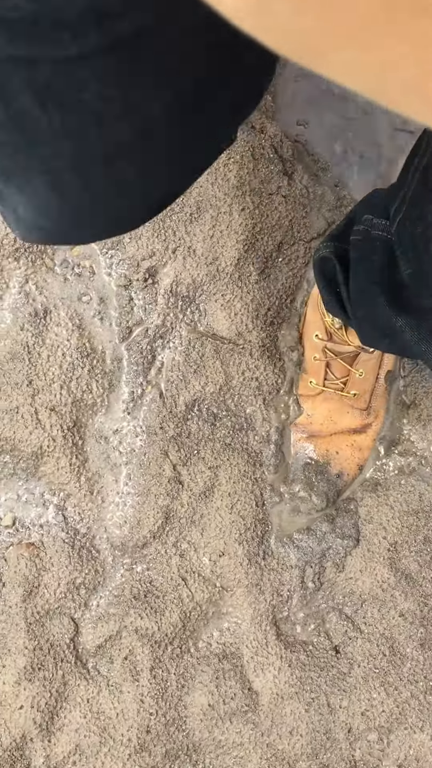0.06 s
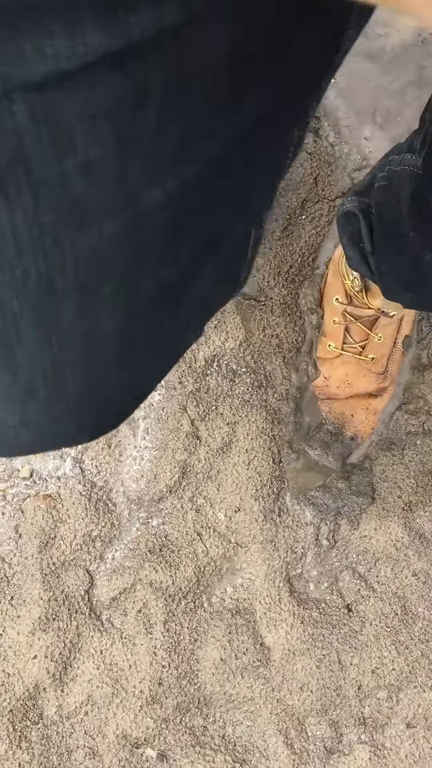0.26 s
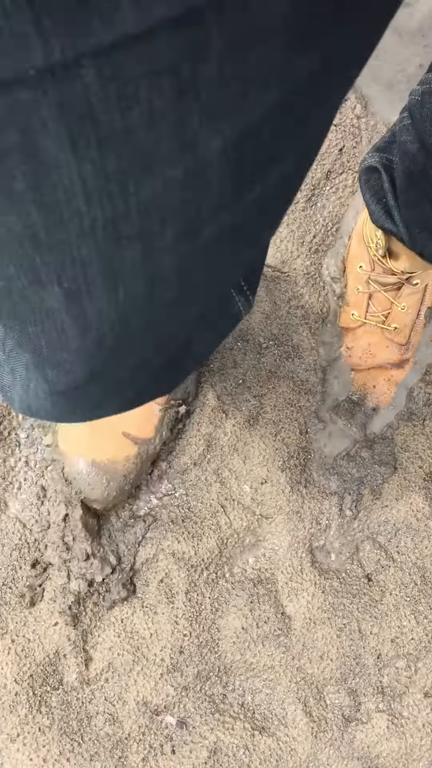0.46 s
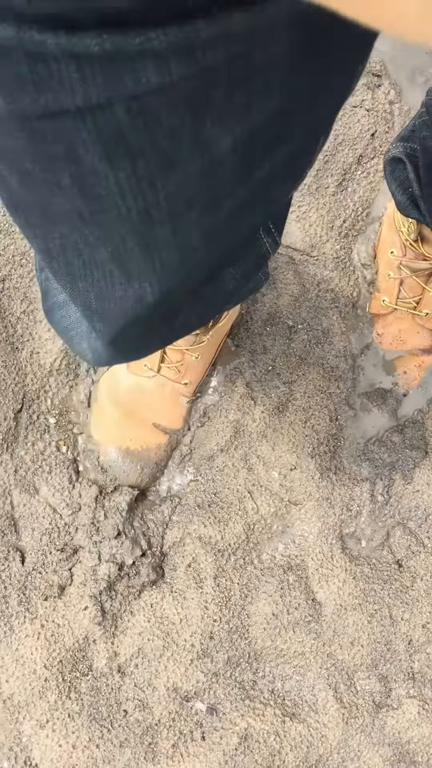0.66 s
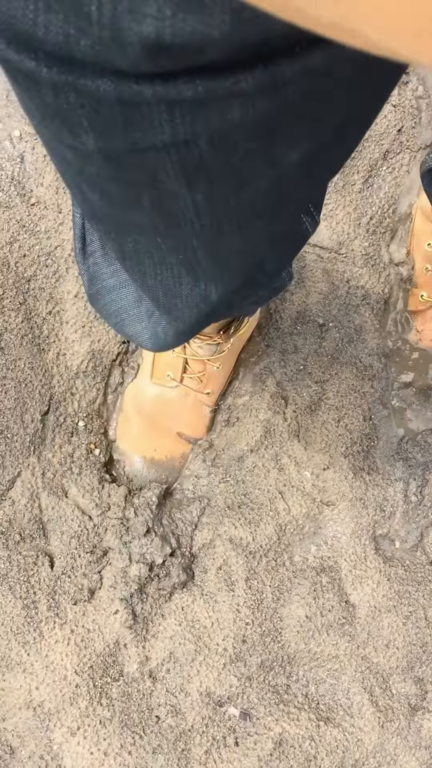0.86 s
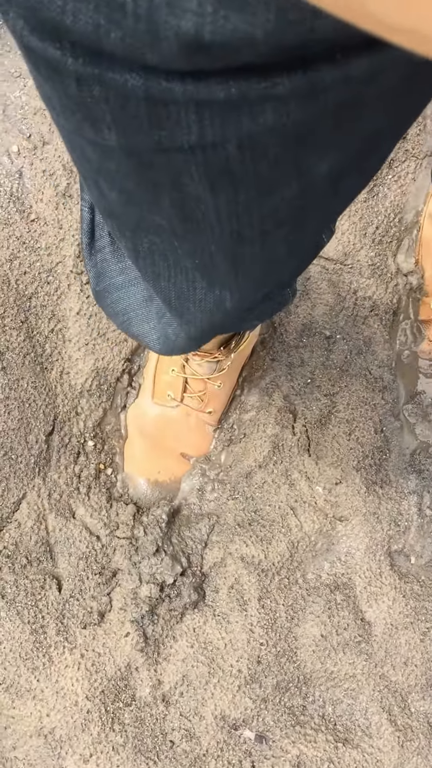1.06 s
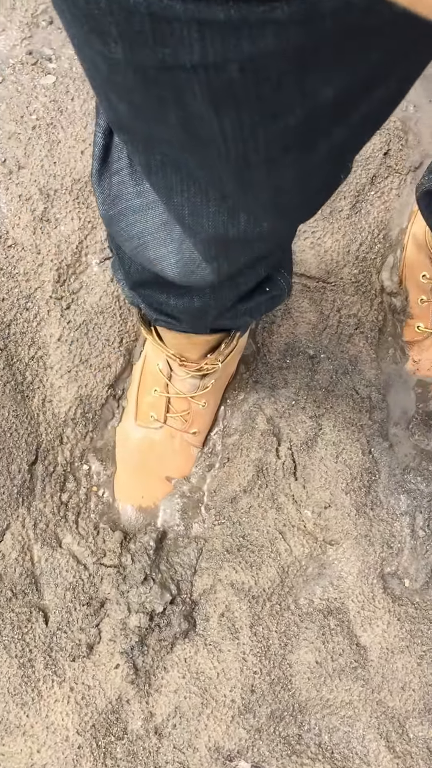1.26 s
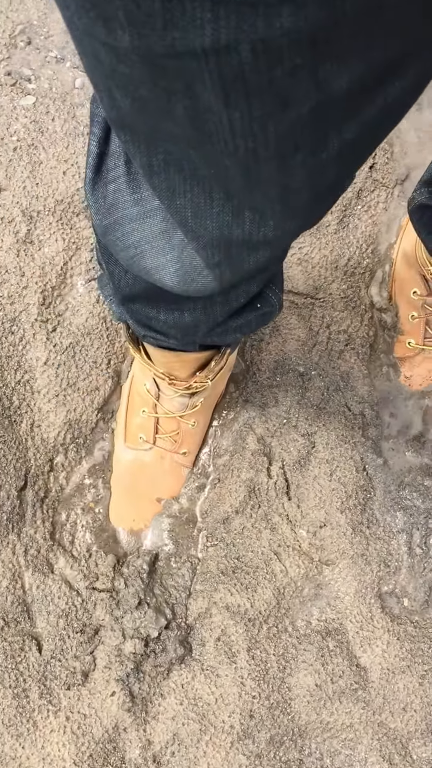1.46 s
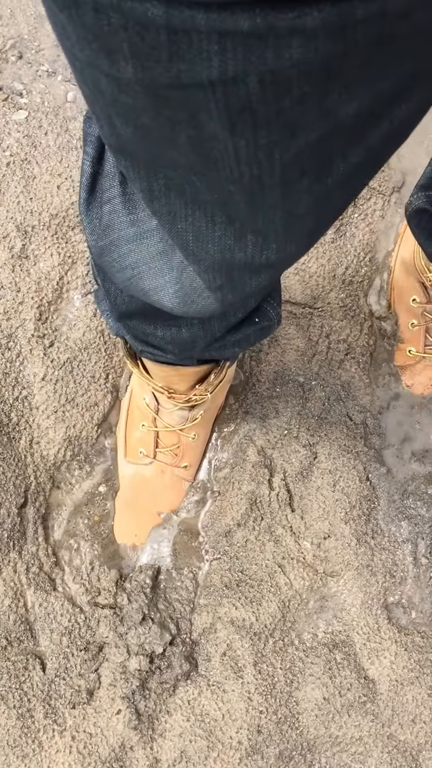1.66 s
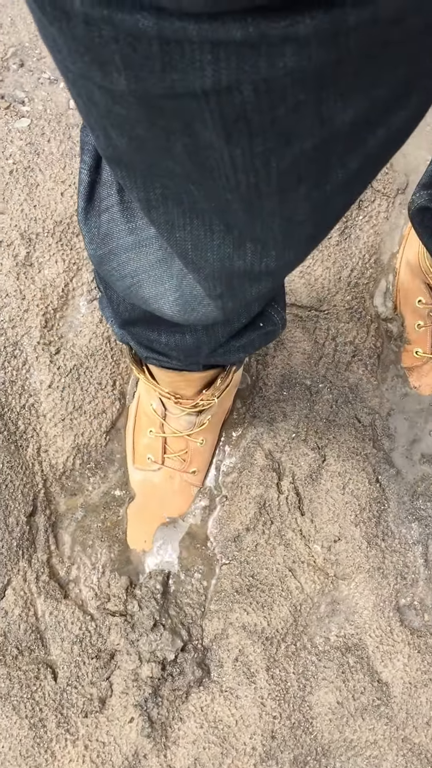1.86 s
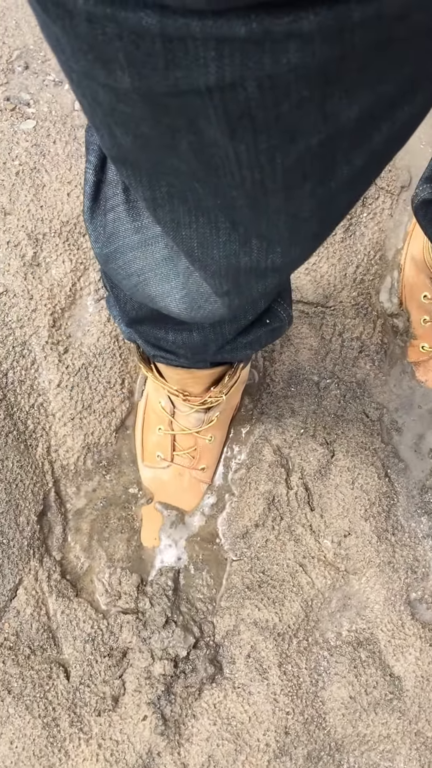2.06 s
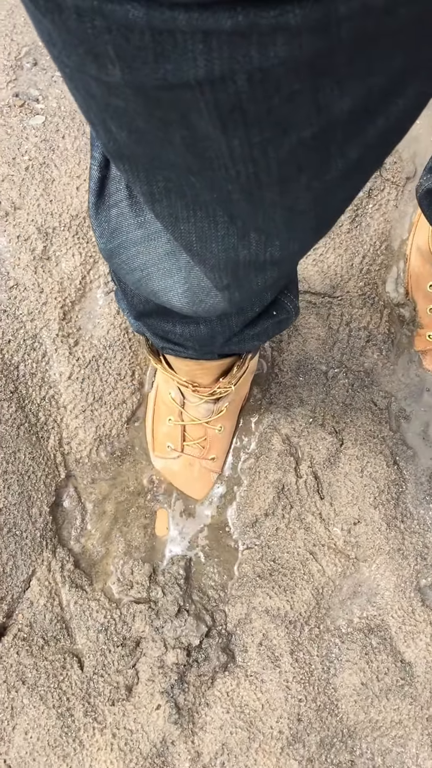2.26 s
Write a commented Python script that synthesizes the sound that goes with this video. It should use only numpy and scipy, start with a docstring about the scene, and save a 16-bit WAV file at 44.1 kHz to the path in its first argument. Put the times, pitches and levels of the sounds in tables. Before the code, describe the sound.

A boot splats once into wet sandy mud outdoors. A soft trouser swish and a light wind bump come first. At 0.5 seconds the boot lands, with squirts, droplet spray and tiny air pops. Water fizzes faintly from the sand until about 1.1 seconds. Wind buffets the microphone in dull, uneven thumps, strongest from 0.6 to 1.7 seconds, then eases to a few weaker bumps around 2 seconds.

```python
"""A trouser leg swishes softly over a faint outdoor background, and wind starts to bump the microphone
in dull, uneven thumps. Half a second in, a boot slaps into wet sandy mud: mud squirts from under the
sole, droplets spray and trapped air pockets pop. Water then fizzes out of the sand as the boot sinks,
while the wind thumps harder."""
import sys
import numpy as np
from scipy import signal
from scipy.fft import rfft, irfft
from scipy.io import wavfile
from scipy.ndimage import map_coordinates

SR = 44100
rng = np.random.default_rng(int(sys.argv[2]) if len(sys.argv) > 2 else 0)


def store_wav(level_fs):
    """Save 16-bit WAV to argv[1]."""
    pcm = np.round(np.clip(np.atleast_2d(level_fs), -1, 1) * 32767)
    wavfile.write(sys.argv[1], SR, pcm.T.astype(np.int16))


N = 105840  # 2.4 seconds

# tone of the outdoor background (frequency [Hz], relative level [dB])
OUTDOOR_TONE = [(20, -12.5), (70, -1.5), (125, -5.5), (170, 8), (215, -14.5), (290, -7.5), (370, -5.5),
                (480, -22), (650, -17.5), (1000, -31.5), (1700, -36), (3500, -47.5), (8500, -52.5),
                (15500, -57.5)]
# tone of the wind's rumble (frequency [Hz], relative level [dB])
RUMBLE_TONE = [(20, -31.5), (40, -9), (75, 5), (120, -4.5), (200, -9), (320, -22), (550, -28.5),
               (900, -51.5), (4000, -92.5)]
# wind strength between the thumps (time [s], level [dB])
WIND_LEVELS = [(0, -47), (.45, -36.5), (.62, -34.5), (.75, -28.5), (1.02, -32), (1.29, -37.5),
               (1.45, -31.5), (1.57, -30.5), (1.7, -29.5), (1.78, -45), (2.15, -37.5), (2.4, -53.5)]
# tone of the swinging trouser leg (frequency [Hz], relative level [dB])
SWISH_TONE = [(250, 11), (370, 19.5), (520, 5.5), (1700, 0), (3500, -13), (7000, -15.5), (15000, -28)]
# two faint ticks of rustling trouser cloth, then small wet ticks around the boot
# (time [s], level [dB], pitch [Hz], width [Hz], fade [s])
SMALL_TICKS = [(.081, -60, 3200, 1630, 0.011), (.097, -64.5, 7750, 1800, .003),
               (.362, -61, 7500, 14000, 0.017), (.4355, -48, 6400, 1500, 0.0017),
               (.6765, -47.5, 6100, 1200, 0.00097), (.724, -61, 8000, 11000, 0.0067),
               (.826, -65, 5500, 6000, 0.009), (.879, -60, 3620, 2540, 0.0061),
               (.938, -70, 6350, 1130, 0.025), (.957, -60.5, 3230, 700, 0.014),
               (1.43, -71, 3570, 1620, 0.026), (1.8942, -49, 7500, 2900, 0.00089)]
# eddies, swirls of air that hit the microphone (time [s], pulse peak [dB], brightness [Hz], churn [s])
WIND_EDDIES = [(0.237, -29.5, 130, 0.029), (0.253, -23.5, 45, 0.0069), (0.577, -17.5, 99.5, 0.012),
               (0.658, -12.5, 168, 0.0037), (0.662, -21.5, 217, 0.0022), (0.7, -21, 274, 0.0022),
               (0.706, -11.5, 115, 0.0027), (0.722, -18.5, 165, 0.018), (.746, -17.5, 370, 0.0052),
               (0.757, -17.5, 225, 0.0053), (0.787, -19.5, 140, 0.023), (.813, -21.5, 267, 0.0037),
               (0.822, -20, 294, 0.0031), (0.846, -18.5, 167, 0.002), (0.864, -20, 102, 0.018),
               (0.877, -15.5, 223, 0.0055), (0.913, -18, 133, 0.0063), (0.924, -16, 50, 0.0086),
               (0.945, -19.5, 167, 0.008), (.984, -24.5, 81, 0.015), (1.014, -22, 132, 0.02),
               (1.076, -18, 131.4, 0.0058), (1.119, -29.5, 195, 0.0061), (1.132, -16.5, 50.6, 0.0067),
               (1.164, -21, 110, 0.0048), (1.187, -21.5, 117, 0.0097), (1.223, -23, 162, 0.019),
               (1.324, -28, 281, 0.0014), (1.345, -19, 50, 0.021), (1.379, -27.5, 120, 0.0033),
               (1.402, -18, 74.5, 0.0029), (1.451, -25.5, 188, 0.0094), (1.5, -22.5, 179, 0.0094),
               (1.534, -25.5, 180, 0.0094), (1.555, -19, 175, 0.013), (1.573, -16, 81, 0.0047),
               (1.64, -24, 215, 0.0081), (1.664, -22.5, 333, 0.0053), (1.679, -22, 190, 0.01),
               (1.693, -24.5, 220, .003), (1.708, -21.5, 80, 0.017), (1.972, -29, 210, 0.0038),
               (1.989, -25, 58.5, 0.0052), (2.063, -28.5, 49.6, 0.0054), (2.139, -24, 200, 0.003)]
# tone of the squirts, spray and bright rustle (frequency [Hz], boost or cut [dB])
WET_TONE = [(300, 5), (800, 2.5), (1100, 2.5), (2400, 0.5), (2850, -5), (3200, 0.5), (4400, -1), (5000, -8),
            (6000, 1), (7700, -8), (8300, -3.5), (15000, -11)]
# mud squirting from under the sole (time [s], level before WET_TONE [dB], pitch [Hz], width [Hz], fade [s])
MUD_SQUIRTS = [(.4745, -48, 7500, 5000, 0.0093), (.4925, -30, 4400, 4000, 0.0053),
               (.4955, -20, 2800, 2930, 0.00098), (.5098, -27.5, 2930, 1800, 0.0041),
               (.5208, -24.5, 3020, 5530, 0.0011), (.5245, -20.5, 4000, 9050, 0.0016),
               (.542, -46, 4500, 3030, 0.0034), (.5515, -38, 2160, 2500, 0.003),
               (.5605, -24, 13200, 5000, 0.00096), (.5742, -33.5, 2250, 2210, 0.0028),
               (.5795, -36.5, 3800, 6530, 0.0065), (.5945, -45, 5100, 3000, 0.0015)]
# tone of the droplet spray, before WET_TONE (frequency [Hz], relative level [dB])
SPRAY_TONE = [(400, -36), (1100, -0.5), (2500, -5), (6000, -5), (8000, -6), (11000, -4), (15500, 0)]
# air pockets popping (time [s], level [dB], starting pitch [Hz], fade [s])
AIR_POCKETS = [(.512, -25.5, 1102, 0.0045), (0.5217, -26.5, 1152, 0.0038), (0.5237, -33, 1653, 0.006),
               (0.55, -23, 1250, 0.00081)]
# water fizzing from tiny gaps in the sand (pitch halfway through [Hz], width [Hz], level [dB])
SAND_PORES = [(1900, 2600, -70.5), (3870, 1800, -73), (6030, 1100, -75.5)]

SLAP_S, TOP_HZ = 0.495, 15900  # when the boot lands; upper edge of the sound


def undb(db):
    """Turn decibels into a number to multiply by."""
    return 10 ** (np.asarray(db) / 20)


def rms(x):
    """The average strength of a signal (root mean square)."""
    return np.sqrt(np.mean(x ** 2) + 1e-18)


def unit(x):
    """Scale a signal to an average strength of 1."""
    return x / rms(x)


def colour(x, tone):
    """Turn frequencies up or down, following a tone table."""
    hz, db = np.array(tone, float).T
    f = np.maximum(np.fft.rfftfreq(len(x), 1 / SR), 1)
    return irfft(rfft(x) * undb(np.interp(np.log(f), np.log(hz), db)), len(x))


def resonate(x, hz, width_hz, order):
    """Make a sound ring around one pitch; a higher order lets less of the rest through."""
    f = np.maximum(np.fft.rfftfreq(len(x), 1 / SR), 1)
    return irfft(rfft(x) / (1 + 1j * (f * f - hz * hz) / (f * width_hz)) ** order, len(x))


def wander(per_s):
    """A value that drifts at random, mostly between -1 and 1."""
    step = int(SR / per_s)
    return np.interp(np.arange(N) / step, np.arange(N // 100), rng.standard_normal(N // 100))


def crackle(size, per_s, scatter_db=0):
    """Tiny clicks at random moments; scatter makes some stand out more."""
    hit = rng.random(size) < per_s / SR
    return hit * rng.standard_normal(size) * undb(scatter_db * np.minimum(rng.exponential(size=size), 4))


def noise(tone):
    """Steady noise with the given tone and a strength of 1."""
    return unit(colour(rng.standard_normal(N), tone))


def add(out, start_s, x):
    """Mix a short sound in at a given time."""
    i = max(int(start_s * SR), 0)
    out[i:i + len(x)] += x[:max(N - i, 0)]


def outdoors(level_db=-45):
    """The faint, low, steady background of the open air."""
    return undb(level_db) * noise(OUTDOOR_TONE)


def wind(t, gust_db=3.5):
    """Wind rumbles on the microphone, fluttering with quick gusts."""
    db = np.interp(t, *np.array(WIND_LEVELS).T) + gust_db * wander(per_s=55)
    return undb(db) * noise(RUMBLE_TONE)


def trousers(t, peak_s=0.15, spread_s=0.63, swish_db=-56, flutter_db=3, rustle_db=-61, rustle_s=0.078):
    """Swinging cloth swishes, with a bright rustle that peaks as the boot lands."""
    swing = np.exp(-((t - peak_s) / spread_s) ** 2 / 2)
    swish = swing * undb(swish_db + flutter_db * wander(per_s=38)) * noise(SWISH_TONE)
    rustle = np.exp(-np.abs(t - SLAP_S) / rustle_s) * noise(WET_TONE)
    return swish + undb(rustle_db) * rustle


def click_bursts(rows, order, rise_s=0.00035, size=4096):
    """Cloth rustles or a wet film tears: each is a short cluster of clicks with its own ring."""
    out, t = np.zeros(N), np.arange(size) / SR
    for start, db, hz, width, fade in rows:
        loudness = np.minimum(t / rise_s, 1) * np.exp(-np.maximum(t - rise_s, 0) / fade)
        clicks = crackle(size, per_s=5900, scatter_db=1) * loudness
        burst = resonate(clicks, hz, width, order)
        add(out, start, undb(db) * unit(burst) * rms(loudness))
    return out


def eddies(low_hz=49, high_hz=1080, churn_db=-8, size=8192):
    """Each swirl is a soft pressure pulse in hollow, churning air; small ones ring higher, with less bass."""
    out, f = np.zeros(N), np.fft.rfftfreq(size, 1 / SR)
    t = (np.arange(size) - size // 2) / SR
    treble_cut = signal.butter(4, high_hz, fs=SR, output="sos")
    for when, db, hz, length in WIND_EDDIES:
        bass_cut = signal.butter(2, low_hz + 0.13 * hz, "highpass", fs=SR, output="sos")
        mic_opening = np.vstack([treble_cut, bass_cut])
        pulse = signal.sosfilt(mic_opening, 1 / (1 + (2 * np.pi * hz * t) ** 2))
        swell = np.exp(-(t / np.where(t < 0, 0.86 * length, length)) ** 2 / 2)  # rises faster than it falls
        dull_air = irfft(rfft(rng.standard_normal(size) * swell) * np.exp(-f / hz))
        hollow = resonate(signal.sosfilt(mic_opening, dull_air), 1.62 * hz, width_hz=2.2 * hz, order=1)
        churn = undb(churn_db) * unit(hollow) * rms(swell)
        push_or_pull = rng.choice([-1, 1])
        add(out, when + t[0], undb(db) * (push_or_pull * pulse / np.abs(pulse).max() + churn))
    return out


def spray(t, hold_s=0.061, fade_s=0.053, drops_per_s=3200, width_hz=2260):
    """The slap throws up a spray that thins into single droplets of different pitch."""
    age = t - SLAP_S
    density = (age > 0) * np.exp(-np.maximum(age - hold_s, 0) / fade_s)
    droplets = sum(resonate(crackle(N, drops_per_s * density), hz, width_hz, order=2)
                   for hz in np.linspace(width_hz / 2, TOP_HZ, 10))
    return unit(colour(np.sqrt(density) * droplets, SPRAY_TONE)) * rms(density)


def air_pockets(rise_per_s=8, size=4096):
    """Trapped air rings briefly, rising in pitch as it escapes."""
    out, t = np.zeros(N), np.arange(size) / SR
    for start, db, hz, fade in AIR_POCKETS:
        ring = np.sin(2 * np.pi * hz * t * (1 + rise_per_s * t / 2))
        loudness = np.exp(-t / fade) * (1 - np.exp(-t * hz))
        add(out, start, undb(db) * ring * loudness)
    return out


def seeping_water(t, peak_s=0.86, spread_s=0.125, spurt_db=4, pitch_sag=0.14):
    """The boot's weight presses water out of the sand in spurts; the pitch sinks as the gaps widen."""
    fizz = np.zeros(N)
    for hz, width, db in SAND_PORES:
        spurts = undb(db + spurt_db * wander(per_s=74))
        fizz += spurts * unit(resonate(crackle(N, per_s=2700), hz, width, order=2))
    progress = (t - peak_s) / spread_s
    speed = 1 - pitch_sag * np.tanh(progress)  # playing the fizz more slowly lowers its pitch
    return np.exp(-progress ** 2 / 2) * map_coordinates(fizz, [np.cumsum(speed)], mode="mirror")


def scene():
    """Background, boot, cloth and wind, all at one microphone."""
    t = np.arange(N) / SR
    background = outdoors()
    splash = colour(undb(-42.5) * spray(t) + click_bursts(MUD_SQUIRTS, order=1), WET_TONE)
    ticks = click_bursts(SMALL_TICKS, order=2)
    boot = splash + air_pockets() + seeping_water(t)
    fade_in = np.minimum(t / 0.004, 1)
    return (boot + ticks + trousers(t) + eddies() + fade_in * (wind(t) + background))[None]


def record(dry, low_cut_hz=31.5):
    """The recorder cuts the deepest rumble and the highest hiss."""
    dry = signal.sosfilt(signal.butter(2, low_cut_hz, "highpass", fs=SR, output="sos"), dry)
    return signal.sosfilt(signal.ellip(10, .2, 80, TOP_HZ, fs=SR, output="sos"), dry)


dry = scene()
out = record(dry)
store_wav(out)
```